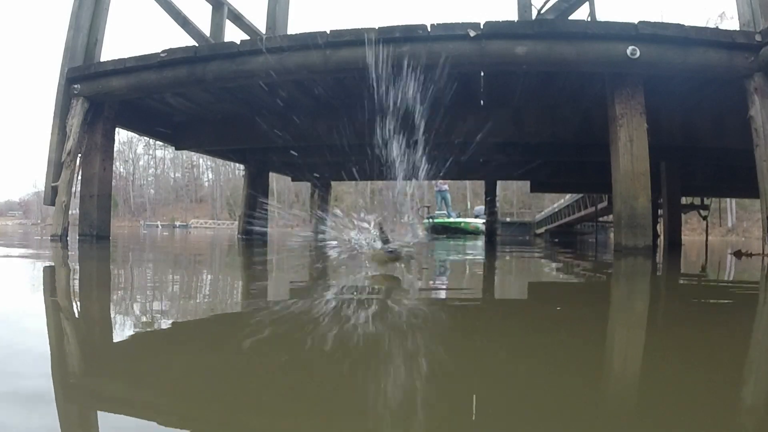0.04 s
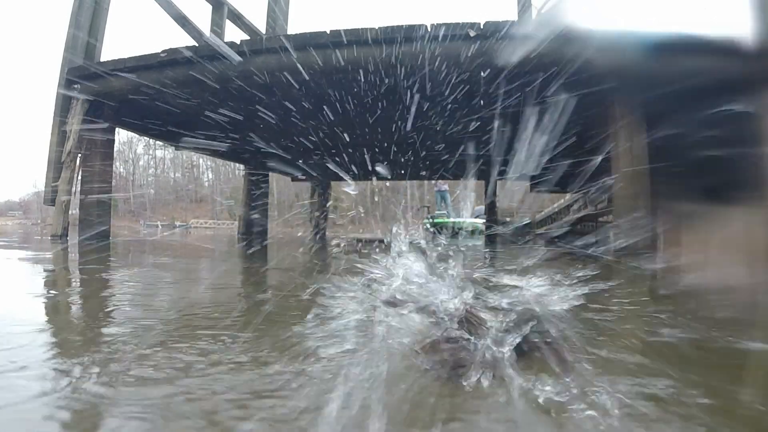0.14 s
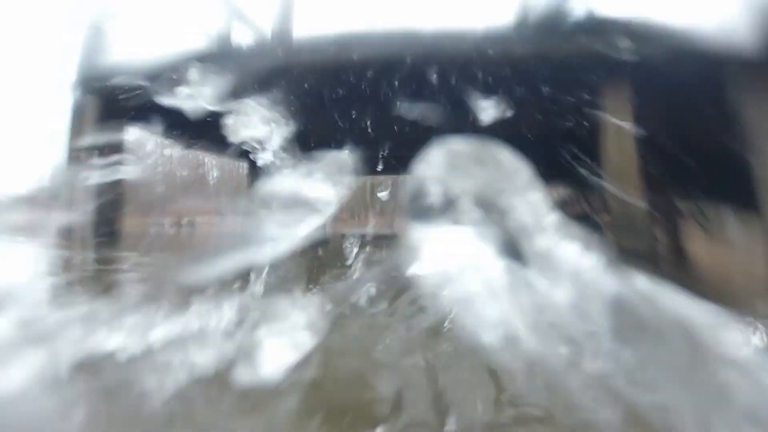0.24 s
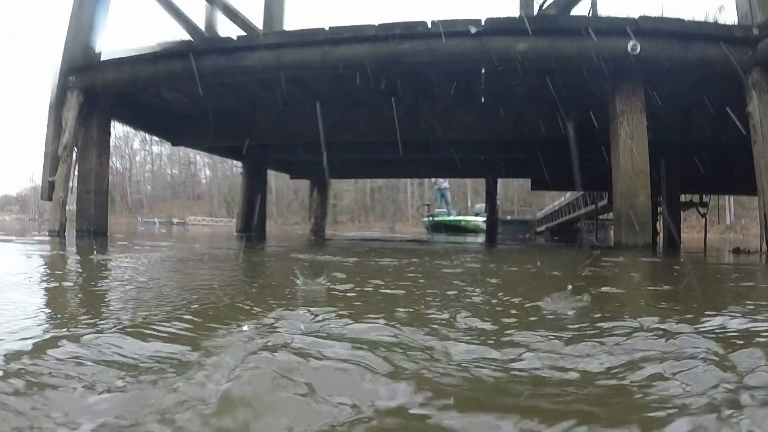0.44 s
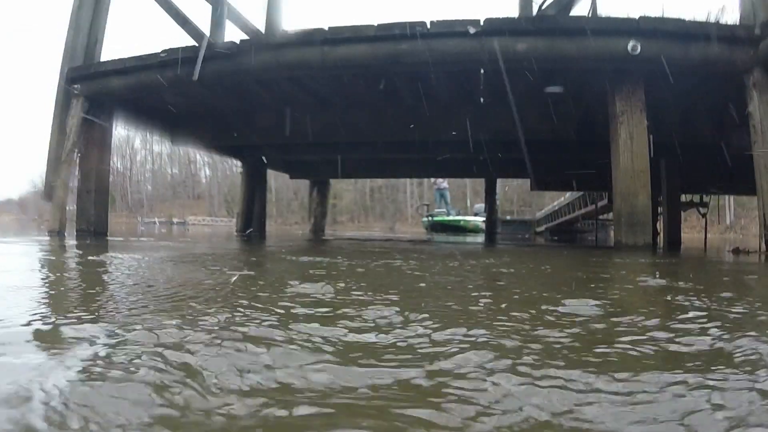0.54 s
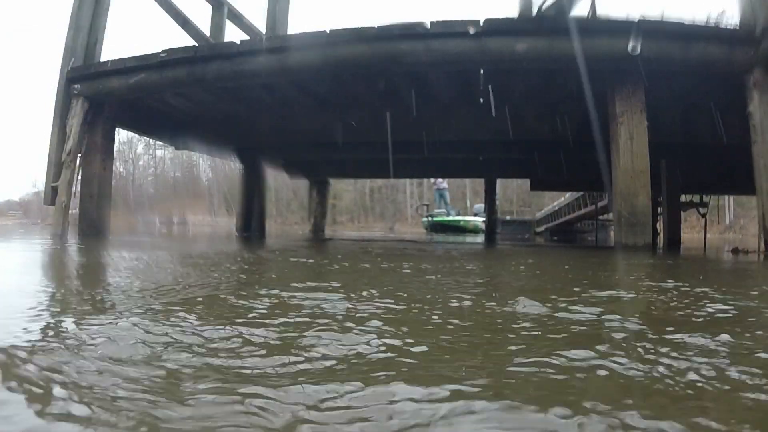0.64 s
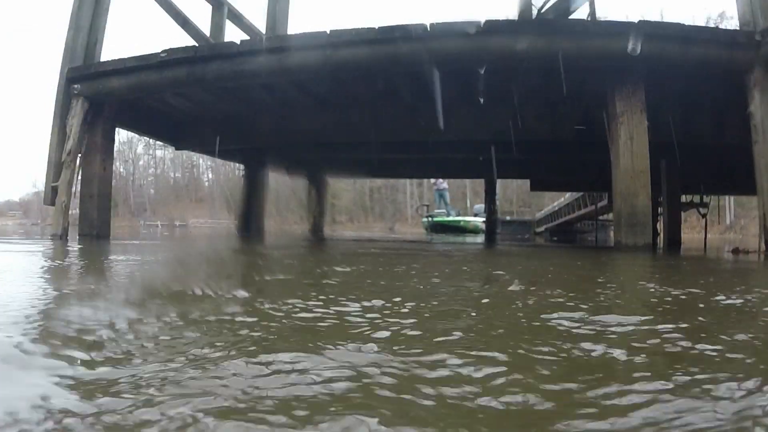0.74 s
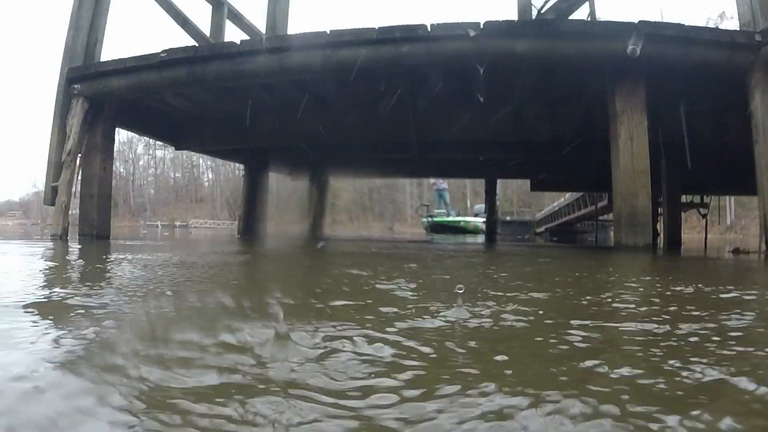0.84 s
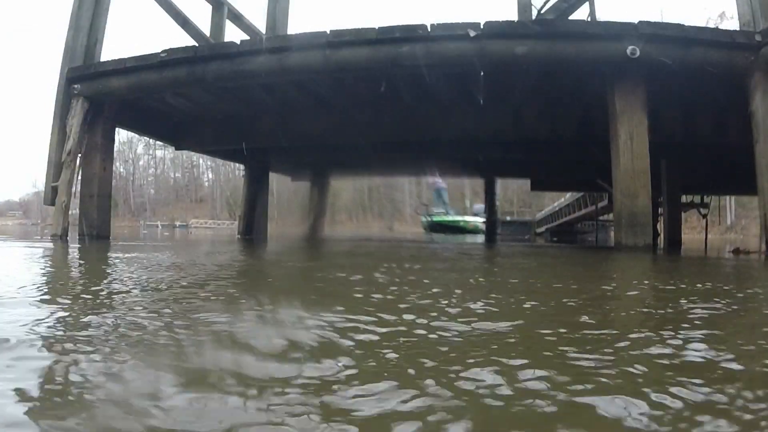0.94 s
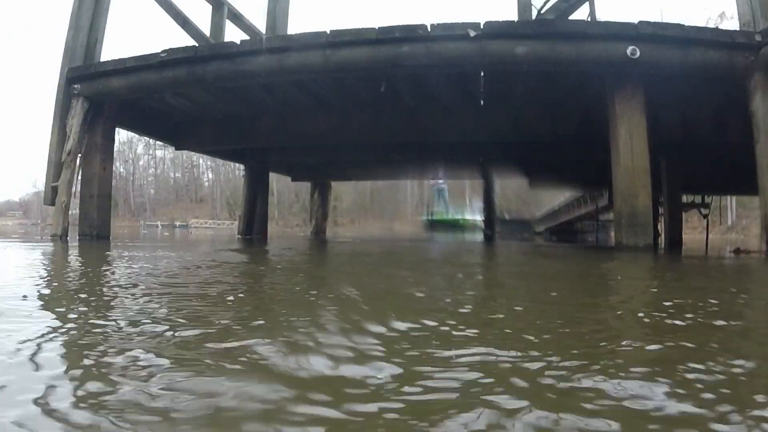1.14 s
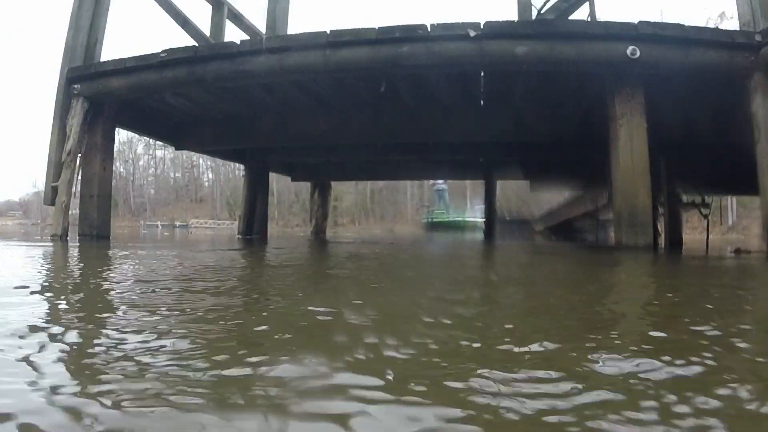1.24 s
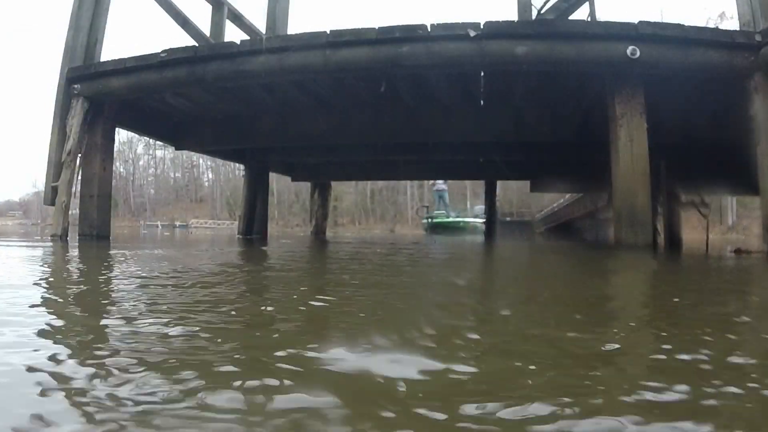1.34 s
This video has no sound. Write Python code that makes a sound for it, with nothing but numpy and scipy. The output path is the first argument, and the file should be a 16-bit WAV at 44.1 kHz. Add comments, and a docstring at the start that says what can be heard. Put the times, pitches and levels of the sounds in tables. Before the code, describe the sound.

A sudden splash from a lure landing on a quiet lake throws water onto a close microphone at water level. A quick volley of hard drop taps and a low rumble give way to a few stray ticks and tiny bubbles.

```python
"""Lure splash beside a dock

A lure skims in and smacks the lake in front of a waterproof housing held at the surface.
Thrown water hits the housing as a volley of drops, each ringing its shell for a few milliseconds.
The wave sets the mount booming, stragglers tick, air pockets ring, the wooden dock reflects
the patter, and quiet lake air goes on behind."""
import sys
import numpy as np
from scipy import signal
from scipy.fft import rfft, irfft
from scipy.io import wavfile
from scipy.ndimage import uniform_filter1d

SR = 44100
rng = np.random.default_rng(int(sys.argv[2]) if len(sys.argv) > 2 else 0)


def unload_audio(sound):
    """Save the sound as a 16-bit wav file, at the path given as the first command line argument."""
    columns = np.transpose(np.atleast_2d(sound))
    # keep every value between -1 and 1, then stretch to whole-number steps
    steps = np.round(np.clip(columns, -1, 1) * 32767)
    wavfile.write(sys.argv[1], SR, steps.astype(np.int16))


N = 61739
TIME = np.arange(N) / SR
TICK_TIME = TIME[:SR // 12]

# housing shell mode families, mid to high: (frequency [Hz], level [dB], t60 [s])
SHELL_RING = [(1434, -2, 0.0099), (1687, -5, 0.011), (2022, 1, 0.017), (2307, 4, 0.0076),
              (2683, 3.5, 0.0084)]
SHELL_CLACK = [(3870, -3, .007), (4200, -5, .006), (4560, 3.5, 0.0041), (5570, -3.5, .006),
               (6040, -8.5, 0.0045), (7220, -10.5, 0.0074)]
SHELL_SIZZLE = [(8870, 3, 0.0045), (9480, -2.5, .006), (10340, -3, .005), (11350, -3.5, 0.0048),
                (12600, -7, .006), (13900, -13, 0.0062), (14700, -19, .005)]


def from_db(db):
    """Decibels to gain."""
    return 10 ** (np.asarray(db) / 20)


def unit_rms(x):
    """Scale to rms 1."""
    return x / np.sqrt(np.mean(x ** 2) + 1e-20)


def envelope(points):
    """Gain curve through (time [s], level [dB]) points."""
    return from_db(np.interp(TIME, *np.transpose(points)))


def noise(spectrum, grains_per_s=SR):
    """Unit-rms noise shaped by (frequency [Hz], level [dB]); sparse grains crackle."""
    hz, db = np.transpose(spectrum)
    bins_hz = np.maximum(np.fft.rfftfreq(2 * N, 1 / SR), 1)
    shape = from_db(np.interp(np.log(bins_hz), np.log(hz), db)) * (bins_hz > 10)
    grains = rng.standard_normal(2 * N) * (rng.random(2 * N) < grains_per_s / SR)
    return unit_rms(irfft(rfft(grains) * shape)[:N])


def ringing(modes, t, gains=1):
    """Damped sines after one blow."""
    hz, db, t60_s = np.transpose(modes)
    sines = np.sin(2 * np.pi * np.outer(hz, t))
    decays = np.exp(-np.log(1000) * np.outer(1 / t60_s, t))
    return (gains * from_db(db)) @ (sines * decays)


def family_band(x, modes):
    """Band-pass to the span of a mode family."""
    margin = 1.011
    edges_hz = [modes[0][0] / margin, min(modes[-1][0] * margin, 0.45 * SR)]
    return signal.sosfilt(signal.butter(2, edges_hz, "band", fs=SR, output="sos"), x)


def shell(modes, weights=1):
    """Shell impulse response: modes start together at randomised strengths."""
    scatter_db = 3.76 * rng.standard_normal(len(modes))
    return ringing(modes, TICK_TIME, weights * from_db(scatter_db))


def drops():
    """Each drop drives the shell with a spike, then a brief spatter as it breaks up."""
    # drop impacts, levels before trim:
    # (time [s], ring centre [Hz], knock [dB], ring [dB], clack [dB], sizzle [dB])
    impacts = [(0.1955, 2170, -32.5, -17.5, -26.5, -41), (0.1987, 2210, -20, -11.5, -22.5, -30),
               (0.2017, 1730, -26, -9, -16.5, -38), (0.2074, 1210, -31, -33, -30, -42),
               (0.2079, 1540, -24.5, -14, -23, -41), (0.2128, 2350, -49, -21, -22, -42),
               (0.2147, 2160, -32, -6, -23, -37), (0.218, 1970, -23, -13, -8, -31),
               (0.2208, 2442, -19.5, -15, -9.5, -25.5), (0.2278, 2600, -22, -12.5, -28, -36.5),
               (0.2295, 2310, -31, -6.5, -18, -30.5), (0.2312, 2107, -19.5, -13.5, -18, -40.5),
               (0.2324, 2170, -24, -16, -12.5, -34), (0.233, 1965, -28, -11.5, -15, -26.5),
               (0.2357, 1700, -32.5, -19.5, -19.5, -41.5), (0.2492, 2176, -42.5, -26, -23, -45.5),
               (0.2542, 1867, -29.5, -31.5, -41, -51), (0.258, 1540, -35.5, -25, -42.5, -53.5),
               (0.263, 2327, -43, -29, -40, -49), (0.2654, 1780, -38, -25, -28.5, -48.5),
               (0.2682, 1960, -27, -25.5, -39, -50), (0.274, 2250, -36, -48, -30, -56),
               (0.278, 1420, -25.5, -31.5, -44, -56), (0.2797, 2800, -36, -35, -55, -48),
               (0.283, 1350, -24, -24.5, -34, -43), (0.2867, 2160, -30.5, -22.5, -29, -46),
               (0.293, 2610, -49, -30.5, -32, -51), (0.3075, 2500, -55, -29, -40, -58),
               (0.3093, 1900, -50, -28, -32.5, -48), (0.321, 1830, -54, -34, -40, -56),
               (0.3241, 1490, -37, -30, -25.5, -50), (0.334, 2320, -39, -28, -25.5, -62),
               (0.34, 2400, -65, -41, -41, -59), (0.3467, 2410, -50, -49.5, -49, -60),
               (0.3508, 1630, -34.5, -29, -41, -51), (0.372, 2700, -59, -43.5, -60, -58),
               (0.398, 2470, -76, -48.5, -45, -58), (0.4225, 2920, -57, -48, -54, -65),
               (0.451, 2000, -71, -53.5, -79.5, -66), (0.4901, 2010, -50, -41.5, -80, -79),
               (0.524, 1770, -46.5, -41, -61, -81.5), (0.528, 2000, -46, -50.5, -67.5, -81.5),
               (0.549, 1640, -56, -39, -57.5, -60.5), (0.584, 2000, -67, -35.5, -50, -67),
               (0.621, 2600, -55, -33, -40.5, -55), (0.6805, 2700, -71, -42.5, -39.5, -53),
               (0.7018, 2530, -48.5, -28, -34.5, -47.5), (0.752, 1490, -67, -53, -53, -71),
               (0.8795, 1940, -59, -39, -78, -68), (0.892, 1976, -39.5, -49, -66, -71),
               (0.948, 2045, -50.5, -45.5, -52.5, -75)]
    # lowest shell modes: (frequency [Hz], level [dB], t60 [s])
    shell_knock = [(162, -20, .08), (275, -13, 0.042), (556, -6, 0.0076), (803, 3, .012), (983, -1.5, .009)]
    knock_trim_db, clack_trim_db, sizzle_trim_db = -0.8, -2.15, -1.06
    spatter_db, spatter_decay_s = -18, 0.0017
    ring_width_oct, ring_floor = 0.073, 0.3
    ring_hz = np.array(SHELL_RING)[:, 0]
    spatter = from_db(spatter_db) * np.exp(-TICK_TIME / spatter_decay_s)
    length = len(TICK_TIME)
    out = np.zeros(N + SR)
    for time_s, centre_hz, knock_db, ring_db, clack_db, sizzle_db in impacts:
        start = int(time_s * SR)
        offset_oct = np.log2(ring_hz / centre_hz)
        ring_weights = ring_floor + np.exp(-0.5 * (offset_oct / ring_width_oct) ** 2)
        families = ((shell_knock, 1, knock_db + knock_trim_db),
                    (SHELL_RING, ring_weights, ring_db),
                    (SHELL_CLACK, 1, clack_db + clack_trim_db),
                    (SHELL_SIZZLE, 1, sizzle_db + sizzle_trim_db))
        for modes, weights, db in families:
            force = spatter * rng.standard_normal(length)
            force[0] = 1
            response = signal.fftconvolve(force, shell(modes, weights))[:length]
            tick = family_band(response, modes)
            tick *= np.sqrt(SR / 1000 / np.sum(tick ** 2))  # energy of 1 ms at rms 1
            out[start:start + length] += from_db(db) * tick
    return out[:N]


def spray():
    """Fine droplets patter on the shell in clumps."""
    # spray strength: (time [s], level [dB])
    contour = [(0, -110), (.18, -90), (.197, -46), (.235, -55), (.255, -35.5), (.288, -36), (.30, -47.5),
               (.335, -41), (.36, -43), (.39, -56), (.45, -72), (.75, -62), (.86, -70.5), (.89, -57),
               (.97, -68), (1.05, -81.5), (1.4, -92.5)]
    droplets_per_s, spread_db = 700, 5
    clump_s, clump_db = 0.004, 3.5
    clumps = unit_rms(uniform_filter1d(rng.standard_normal(N), int(clump_s * SR)))
    size_db = spread_db * np.minimum(rng.exponential(1, N), 4) + clump_db * np.clip(clumps, -2, 2)
    droplets = from_db(size_db) * (rng.random(N) < droplets_per_s / SR)
    out = np.zeros(N)
    for modes, db in ((SHELL_RING, -1), (SHELL_CLACK, -11), (SHELL_SIZZLE, -23)):
        patter = np.zeros(N)
        for mode in modes:
            force = droplets * rng.standard_normal(N)
            patter += signal.fftconvolve(force, shell([mode]))[:N]
        out += from_db(db) * unit_rms(family_band(patter, modes))
    return out * envelope(contour)


def mount_boom():
    """Each wave leaves the mount swinging in its low modes."""
    # wave pushes: (time [s], level [dB], rise constant [s])
    pushes = [(0.207, -20.5, 0.017), (0.3494, -19, 0.0042), (0.4403, -25.5, 0.019), (0.896, -47.5, 0.0081),
              (1.017, -45, 0.0065)]
    # mount resonances: (frequency [Hz], level [dB], t60 [s])
    mount_modes = [(66.6, -0.5, 0.18), (72.24, -14, 1.36), (138, -26, .25), (180, -23.5, .4)]
    out = np.zeros(N)
    for time_s, db, rise_s in pushes:
        age_s = np.maximum(TIME - time_s, 0)
        out += from_db(db) * (1 - np.exp(-age_s / rise_s)) * ringing(mount_modes, age_s)
    return out


def surges():
    """Dull churning while water presses on the housing."""
    # water shoves: (start [s], length [s], level [dB])
    shoves = [(0.194, 0.025, -36), (0.239, 0.02, -38.5), (0.271, 0.016, -32), (0.303, 0.056, -37.5),
              (0.89, .012, -48)]
    # churn spectrum: (frequency [Hz], relative density [dB])
    spectrum = [(25, -13.5), (60, 4), (130, -1), (260, -4.5), (450, -15.5), (750, -14), (1200, -15.5),
                (3000, -50)]
    rise_s, decay_s = 0.0018, 0.0025
    pressure = np.zeros(N)
    for start_s, length_s, db in shoves:
        attack = np.clip((TIME - start_s) / rise_s, 0, 1)
        release = np.exp(-np.maximum(TIME - start_s - length_s, 0) / decay_s)
        pressure += from_db(db) * attack * release
    return pressure * noise(spectrum)


def bubbles():
    """Air pockets ring as they close, rising slightly in pitch."""
    # hollow glugs to tiny pings: (time [s], start frequency [Hz], level [dB], t60 [s])
    pockets = [(.160, 8900, -44, .009), (0.371, 6100, -42, 0.02), (.398, 3730, -43, 0.023),
               (0.403, 6440, -52, 0.012), (.414, 6530, -47.5, 0.0092), (0.423, 6430, -46.5, 0.011),
               (0.523, 2765, -44, 0.026), (0.531, 183, -55.5, .2), (0.619, 170, -55, 0.18),
               (0.6211, 1470, -29.5, 0.013), (0.6806, 5950, -35.5, 0.0099), (0.704, 169, -43, 0.1),
               (0.89, 173.7, -43.5, .2)]
    rise_per_t60 = 0.035
    out = np.zeros(N)
    for time_s, hz, db, t60_s in pockets:
        age_s = np.maximum(TIME - time_s, 0)
        cycles = hz * age_s * (1 + 0.5 * rise_per_t60 * np.minimum(age_s / t60_s, 2))
        out += from_db(db) * np.sin(2 * np.pi * cycles) * np.exp(-np.log(1000) * age_s / t60_s)
    return out


def lure_skim():
    """Thin hiss of the lure skimming the surface before the splash."""
    # swishes: (start [s], level [dB], rise [s], decay constant [s])
    swishes = [(.054, -48.5, 0.0077, 0.034), (0.16, -47, .002, .006), (.18, -49, 0.012, .012)]
    # hiss spectrum: (frequency [Hz], relative density [dB])
    spectrum = [(1200, -31), (2700, -7), (4000, -3.5), (5600, -1), (7300, -10), (9000, -21.5),
                (14000, -18.5), (16000, -32)]
    swell = np.zeros(N)
    for start_s, db, rise_s, decay_s in swishes:
        attack = np.clip((TIME - start_s) / rise_s, 0, 1)
        release = np.exp(-np.maximum(TIME - start_s - rise_s, 0) / decay_s)
        swell += from_db(db) * attack * release
    return swell * noise(spectrum, grains_per_s=4800)


def dock_reflections(splash):
    """Short, dull scatter from the deck and its posts."""
    gain_db, t60_s, delay_s, cutoff_hz = -27, 0.14, 0.008, 6200
    tail = rng.standard_normal(N) * np.exp(-np.log(1000) * TIME / t60_s) * (TIME > delay_s)
    tail = signal.sosfilt(signal.butter(2, cutoff_hz, fs=SR, output="sos"), tail)
    tail /= np.sqrt(np.sum(tail ** 2))
    return from_db(gain_db) * signal.fftconvolve(splash, tail)[:N]


def lake_air():
    """Quiet, low background noise that dips after the splash."""
    # air loudness: (time [s], level [dB])
    contour = [(0, -55.5), (.08, -55), (.2, -55.5), (.42, -59.5), (.62, -57), (.88, -54.5), (1.4, -55.5)]
    # air spectrum: (frequency [Hz], relative density [dB])
    spectrum = [(25, -6), (60, -1), (110, -2), (180, -3.5), (300, -6), (575, -11), (1100, -14), (2200, -19),
                (5000, -26), (9000, -33.5), (14300, -40.5), (16000, -56)]
    return envelope(contour) * noise(spectrum)


def scene():
    """Splash, boom and lake air in mono."""
    splash = drops() + spray()
    mix = splash + dock_reflections(splash) + mount_boom() + surges() + bubbles()
    return (mix + lure_skim() + lake_air())[None]


def record(dry):
    """Clip at full scale, then low-pass steeply."""
    stopband_hz = 16500
    lowpass = signal.cheby2(14, 60, stopband_hz, fs=SR, output="sos")
    return signal.sosfilt(lowpass, np.clip(dry, -1, 1))


dry = scene()
out = record(dry)
unload_audio(out)
```